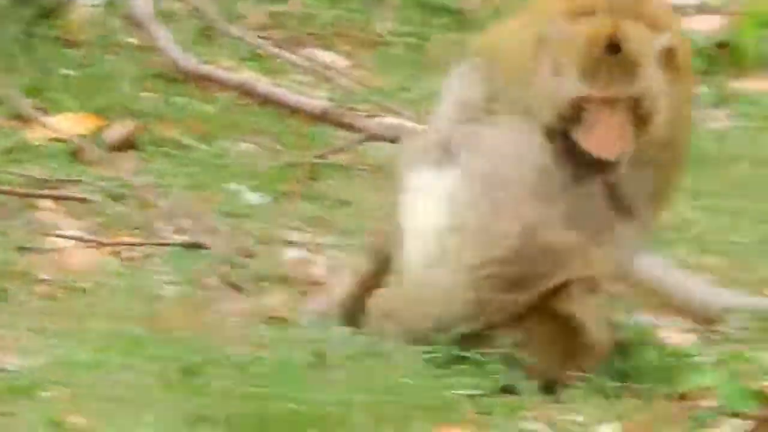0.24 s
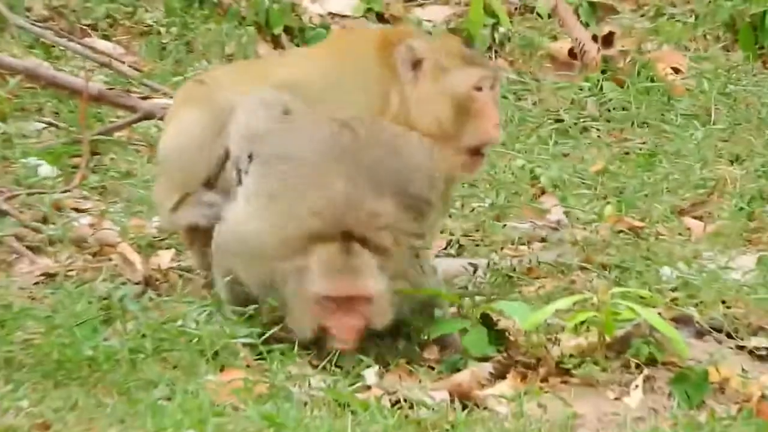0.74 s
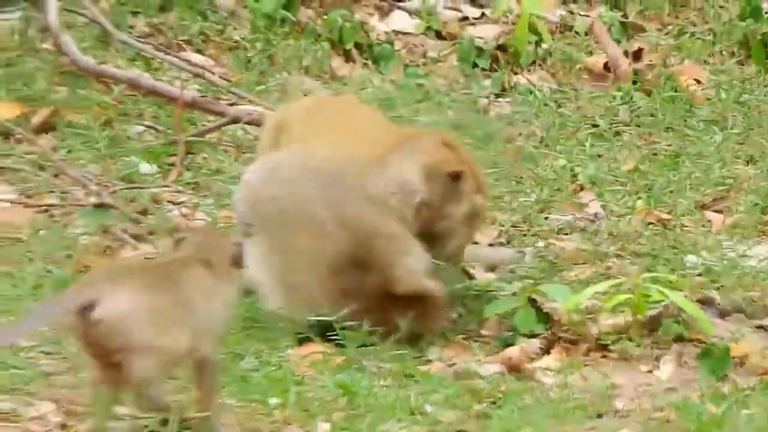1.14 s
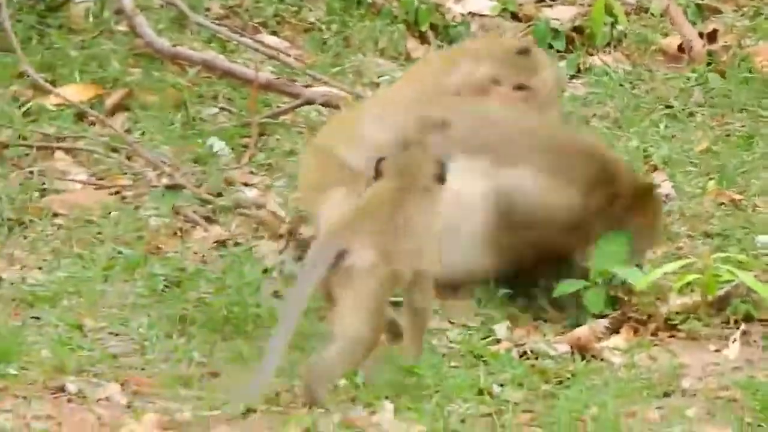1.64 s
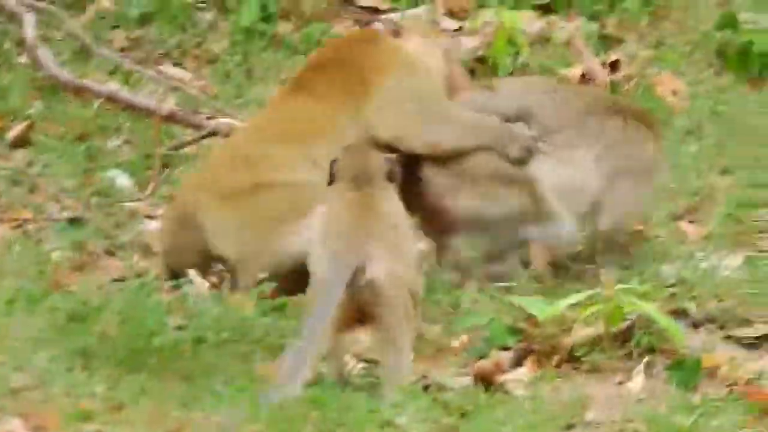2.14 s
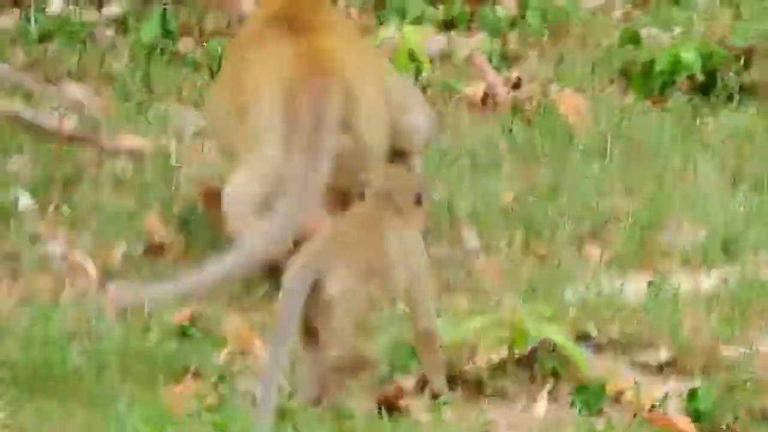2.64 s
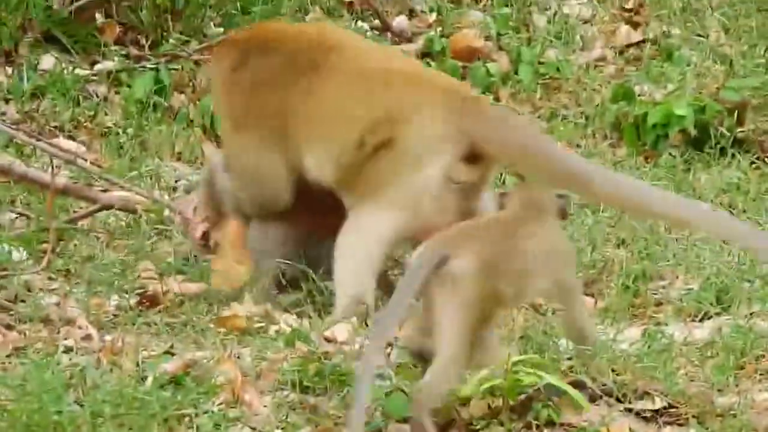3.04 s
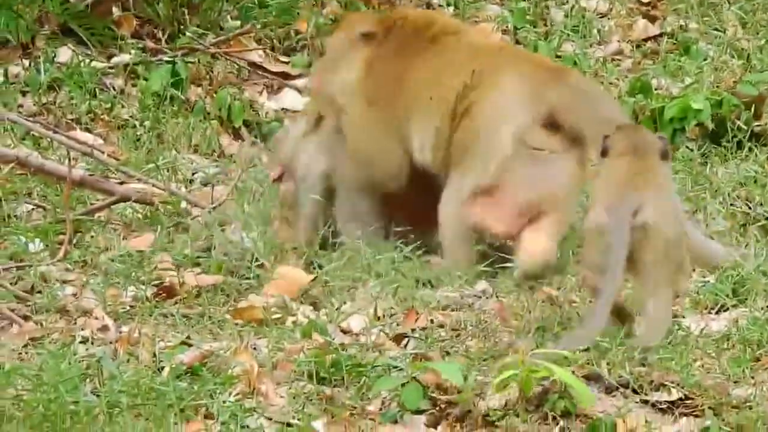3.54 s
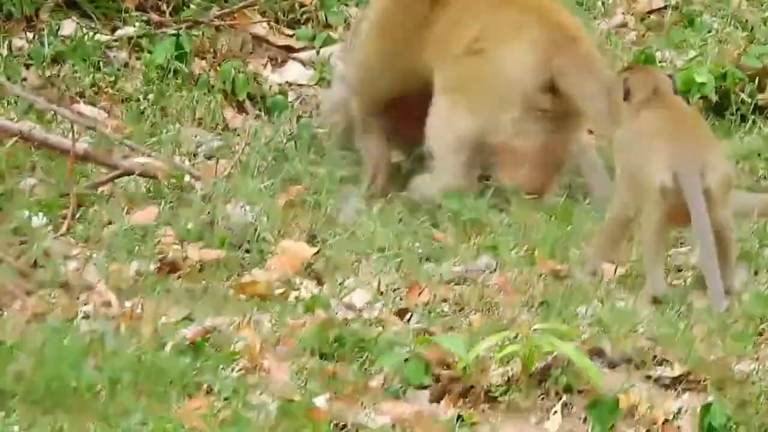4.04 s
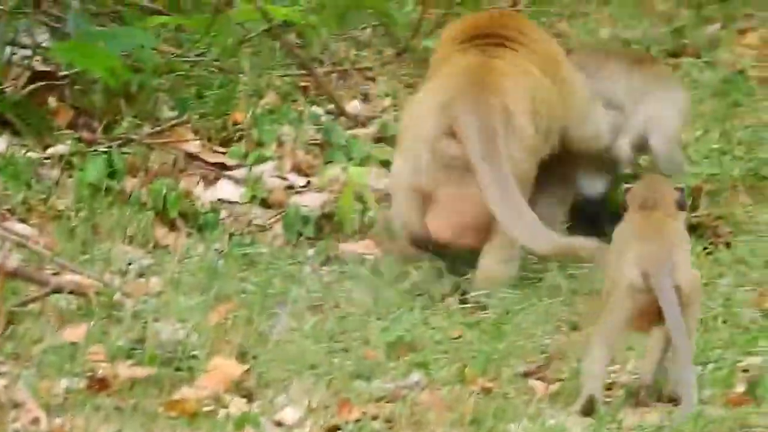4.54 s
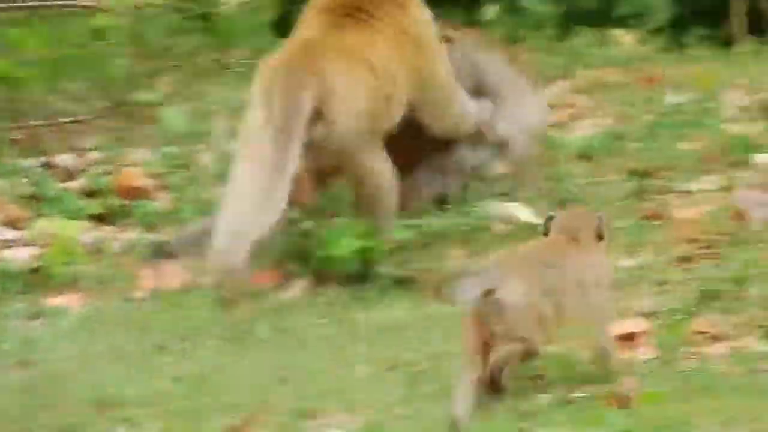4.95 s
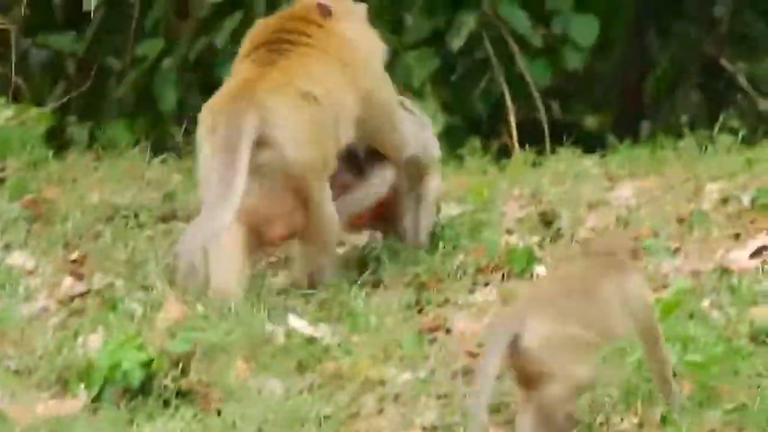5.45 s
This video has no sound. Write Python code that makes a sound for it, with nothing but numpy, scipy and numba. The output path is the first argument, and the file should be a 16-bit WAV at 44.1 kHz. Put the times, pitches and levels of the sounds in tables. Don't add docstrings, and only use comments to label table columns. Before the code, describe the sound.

Outdoors at a grassy forest edge, a macaque being bitten screams in harsh, noisy, very high bursts, cracking briefly into clean squeals. An adult gives one short rough grunt early on. After a tiny gap a second bout surges loudest, then weakens into thin whimpers. Distant traffic rumble, a faint engine hum and leaf hiss continue beneath. Stereo microphone some metres away, with light forest scatter.

```python
import sys
import numpy as np
from scipy import signal
from scipy.fft import rfft, irfft
from scipy.io import wavfile
from scipy.ndimage import uniform_filter1d
from numba import njit

SR = 44100
rng = np.random.default_rng(int(sys.argv[2]) if len(sys.argv) > 2 else 0)


def volts_from_decibels(level):
    exponent = np.asarray(level, float) / 20
    return 10 ** exponent


def transcribe(u):
    v = np.clip(np.atleast_2d(u).T, -1, 1)
    q = np.round(v * 32767).astype(np.int16)
    wavfile.write(sys.argv[1], SR, q)


N = 251811


def unit(x):
    return x / np.sqrt(np.mean(x ** 2))


def along(rows):
    s, *columns = np.transpose(rows)
    return [np.interp(np.arange(N) / SR, s, column) for column in columns]


def spans(rows):
    return [[(row[0],), (row[0] + row[1],)] for row in rows]


def gate(tables, fade_s, tail_s=None):
    t = np.arange(N) / SR
    total = 0
    for rows in tables:
        rise = (t - rows[0][0]) / fade_s
        fall = (rows[-1][0] - t) / (tail_s or fade_s)
        total = total + np.clip(np.minimum(rise, fall) + 1, 0, 1) ** 2
    return total


def walk(rate):
    hold = max(int(SR / rate), 1)
    steps = np.repeat(rng.standard_normal(N // hold + 1), hold)
    return unit(uniform_filter1d(uniform_filter1d(steps, hold), hold)[:N])


def colour(x, points):
    hz, db = np.transpose(points)
    bins = np.arange(N // 2 + 1) * SR / N + 1
    return irfft(rfft(x) * volts_from_decibels(np.interp(np.log(bins), np.log(hz), db)), N)


@njit
def svf(x, hz, width):
    y, band, low = np.empty(len(x)), 0., 0.
    for i in range(len(x)):
        g = np.tan(np.pi * hz[i] / SR)
        k = width / hz[i]
        v = (band + g * (x[i] - low)) / (1 + g * (g + k))
        band, low, y[i] = 2 * v - band, low + 2 * g * v, k * v
    return y


def steady(x):
    return x / np.sqrt(uniform_filter1d(x ** 2, size=2048) + 1e-12)


def resonance(x, hz, width_hz):
    return steady(svf(svf(x, hz, width_hz), hz, width_hz))


@njit
def folds(hz, stretch, size):
    pulses, phase, cycle = np.zeros(len(hz) + 1), 0., 0
    for i in range(len(hz)):
        step = hz[i] * stretch[cycle] / SR
        phase += step
        if phase >= 1:
            phase, cycle = phase - 1, cycle + 1
            pulses[i] += size[cycle] * phase / step
            pulses[i + 1] += size[cycle] * (1 - phase / step)
    return pulses[:-1]


def closings(hz, jitter, shimmer_db):
    chance = np.clip(rng.standard_normal((len(hz) // 4, 2)).T, -2, 2)
    return folds(hz, np.exp(jitter * chance[0]), volts_from_decibels(shimmer_db * chance[1]))


# (frequency [Hz], density [dB per Hz])
RUMBLE_SPECTRUM = [(15, -54), (25, -45.5), (46, -13.5), (76, 1.5), (157, -1), (183, -2), (238, -1),
                   (455, -15.5), (723, -17), (1000, -17), (1300, -30), (2200, -120)]
# (frequency [Hz], density [dB per Hz])
HISS_SPECTRUM = [(590, -77), (1000, -4.5), (1290, -3.5), (1490, -6), (1750, -5.5), (1990, -6.5),
                 (2280, -8.5), (2620, -10), (7100, -11.5), (9460, -28), (15500, -70)]
# (time [s], level [dB])
DEEP_TRAFFIC = [
    (0, 3.5),
    (1.2, 0.5),
    (4, -2),
    (5.7, -4),
]


def background():
    rumble, hiss = rng.standard_normal((2, 2, N))
    rumble = np.array([colour(noise, RUMBLE_SPECTRUM) for noise in rumble])
    deep = np.array([colour(noise, [(70, 3), (140, -16)]) for noise in rumble])
    rumble_gain = volts_from_decibels(-27)
    deep_change = (volts_from_decibels(along(DEEP_TRAFFIC)[0]) - 1) * deep * rumble_gain / rumble.std()
    rumble = unit(rumble) * rumble_gain + deep_change

    hum = resonance(rng.standard_normal(N), np.full(N, 189.), 14.) * volts_from_decibels(-35.5 + 1.5 * walk(3))
    hiss = unit(np.array([colour(noise, HISS_SPECTRUM) for noise in hiss])) * volts_from_decibels(-36 + .8 * walk(3))
    return rumble * volts_from_decibels(.8 * walk(4)) + hiss + hum * np.array([[1], [0]])


# (time [s], effort [dB], mouth opening as its centre resonance [Hz])
FIRST_BOUT = [
    [(0.0, -13, 6450), (0.07, -23, 6650), (0.08, -24, 6670), (0.122, -20, 6520), (0.248, -22, 6360),
     (0.324, -14, 5795), (0.39, -34, 5330)],
    [(0.585, -48, 6080), (0.597, -21.5, 5980), (0.659, -20.5, 6185), (0.715, -11.5, 5500),
     (0.779, -18.5, 6066), (0.965, -11.5, 5794), (1.051, -19.5, 6070), (1.075, -39, 5510)],
    [(1.2, -32, 6000), (1.21, -17, 5980), (1.238, -13.5, 5950), (1.294, -25, 6190), (1.584, -29, 6675),
     (1.7, -14, 5620), (1.726, -29, 5680), (1.77, -28.5, 5690)],
    [(1.928, -26.5, 5230), (1.948, -15, 5190), (1.966, -22, 5185), (2.012, -18, 5960), (2.066, -19, 6050),
     (2.11, -25, 5880)],
    [(2.243, -23.5, 6040), (2.267, -12, 6120), (2.329, -21.5, 5300), (2.37, -43, 5660)],
]
SECOND_BOUT = [
    [(2.54, -31, 6060), (2.564, -24, 5735), (2.652, -15.5, 6314), (2.882, -20.5, 5770),
     (2.974, -20.5, 6330), (3.032, -28.5, 6220), (3.09, -6, 6200), (3.155, -31, 5630)],
    [(3.415, -43, 6040), (3.421, -28, 6090), (3.445, -20.5, 6224), (3.533, -10, 5887), (3.545, -12.5, 5686),
     (3.727, -14.5, 5420), (3.809, -20, 4844), (3.92, -35.5, 5245)],
    [(4.08, -37, 5580), (4.094, -25.5, 5586), (4.144, -23, 6085), (4.2, -19, 5420), (4.248, -23.5, 5740),
     (4.368, -27.5, 5330), (4.42, -31, 5510)],
    [(4.52, -30.5, 4940), (4.556, -22.5, 5380), (4.628, -12.5, 5380), (4.658, -9, 5380), (4.674, -17, 5450),
     (4.734, -19, 5980), (4.84, -28, 6170), (4.95, -34, 5920)],
    [(4.99, -26.5, 6090), (5.026, -22.5, 5890), (5.062, -26, 5940), (5.12, -29.5, 4955), (5.162, -37, 4990),
     (5.2, -34, 5700)],
]


def effort():
    effort_db, centre_hz = along(sum(FIRST_BOUT + SECOND_BOUT, []))
    opening_hz = centre_hz - 5900
    opening_khz = opening_hz / 1000
    push_db = np.maximum(effort_db + 16, -8.5)
    lips_db = 8.5 * opening_khz + 0.01 * push_db
    throat_db = -0.3 + 3.4 * opening_khz - 0.26 * push_db
    top_db = -19.5 + 16.3 * opening_khz - 0.7 * push_db
    mouth_db = effort_db - 10 * np.log10(1 + volts_from_decibels(2 * lips_db))
    mouth_hz, lips_hz = 5419 + .6 * opening_hz, 6395 + .5 * opening_hz
    return mouth_db, mouth_hz, lips_db, lips_hz, throat_db, top_db


# (frequency [Hz], gain [dB])
MOUTH_ROLLOFF = [(7800, 0), (10500, -8), (15500, -24)]


def screams(flutter_db=1.0, duck_db=-5, patchy_db=2.0):
    mouth_db, mouth_hz, lips_db, lips_hz, throat_db, top_db = effort()
    pulses = closings(mouth_hz / 2 * np.exp(.06 * walk(120)), .13, 3)
    other = closings(lips_hz / 2 * np.exp(.07 * walk(120)), .13, 3)
    throat = steady(colour(pulses + other, [(500, -70), (1300, -20), (1900, 4), (2800, -7), (3600, 0),
                                            (4400, 3), (5200, -12)]))
    mouth = resonance(pulses, mouth_hz * (1 + .015 * walk(60)), 1650.)
    lips = resonance(other, lips_hz * (1 + .015 * walk(60)), 1950.)
    airy = pulses / pulses.std() + rng.standard_normal(N)
    top = steady(colour(airy, [(3000, -70), (6500, -16), (8300, 0), (10000, -4), (12500, -18), (15500, -42)]))

    patchy_mouth = volts_from_decibels(patchy_db * walk(30)) * mouth
    patchy_lips = volts_from_decibels(lips_db + patchy_db * walk(29.91)) * lips
    voice = colour(patchy_mouth + patchy_lips, MOUTH_ROLLOFF)
    voice = voice + volts_from_decibels(throat_db - 9.0) * throat
    voice = voice + volts_from_decibels(top_db - 5.0 + 1.07 * walk(24.7)) * top
    locked = np.clip(gate(spans(SHRIEKS + YELPS), 0.012), 0, 1)
    level = volts_from_decibels(mouth_db - 0.04 + flutter_db * walk(40) + duck_db * locked)
    return voice * level * gate(FIRST_BOUT + SECOND_BOUT, .011, .035)


# ((pitch [Hz], width [Hz]), strands (start [s], length [s], level [dB]))
REGISTERS = [
    ((1725, 370), [(.602, 0.19, -31.5), (1.032, 0.043, -35.5), (1.188, 0.048, -35.5), (3.502, 0.055, -40)]),
    ((2250, 500), [(0, 0.093, -32), (1.96, 0.085, -29.5), (2.367, .17, -32.5), (2.611, .34, -30.5), (4.68, 0.051, -23.5), (4.763, 0.086, -35.5), (4.992, 0.089, -27)]),
    ((2790, 440), [(.29, 0.086, -24), (2.62, 0.4, -32), (3.563, 0.23, -33), (4.272, 0.17, -33.5), (4.546, 0.083, -28.5), (4.757, .126, -40)]),
    ((3360, 420), [(.023, 0.41, -37.5), (.708, 0.028, -30), (.913, 0.16, -28.5), (1.217, .095, -32.5), (1.944, 0.052, -25.5), (2.24, 0.085, -27), (2.78, 0.16, -35), (3.072, 0.054, -32), (3.46, .1, -44), (3.562, 0.2, -22.5), (4.208, 0.09, -30.5), (4.532, 0.084, -29.5), (5.01, 0.04, -28.5)]),
    ((4400, 800), [(0, 0.087, -28), (1.0, 0.095, -25), (2.59, 0.085, -30.5), (3.47, 0.077, -33), (3.78, 0.096, -30)]),
]
# (start [s], length [s], first pitch [Hz], last pitch [Hz], level [dB])
SLIDES = [(.63, 0.095, 6226, 5300, -17), (.93, 0.11, 6446, 7300, -26.5), (1.294, .04, 7100, 7300, -30),
          (1.409, 0.078, 6300, 6500, -31), (1.666, .055, 5290, 5800, -21.5),
          (1.663, 0.085, 2700, 2257, -29), (2.289, 0.06, 5890, 5320, -25), (2.31, 0.036, 4780, 3890, -26),
          (2.673, 0.11, 3265, 3840, -27.5), (3.09, 0.028, 6500, 5900, -30), (3.721, .055, 3000, 2500, -28),
          (3.565, 0.0551, 5930, 6400, -19), (4.122, 0.16, 1820, 2144, -34), (4.52, 0.12, 1861, 2224, -27.5),
          (5.101, 0.05, 4410, 4216, -30)]


def strands():
    out, flicker, sway = np.zeros(N), volts_from_decibels(3 * walk(70)), walk(50)
    events = []
    for (hz, width_hz), rows in REGISTERS:
        for start, length, db in rows:
            events.append((start, length, hz, hz * (1 - .015), db, width_hz))
    for start, length, first_hz, last_hz, db in SLIDES:
        events.append((start, length, first_hz, last_hz, db, 400))

    for start, length, first_hz, last_hz, db, width_hz in events:
        a, b = int(start * SR), int((start + length) * SR)
        hz = np.linspace(first_hz, last_hz, b - a)
        pulses = closings(hz, width_hz / first_hz, 2.5)
        voice = resonance(pulses, hz * (1 + .02 * sway[a:b]), 1.3 * width_hz)
        out[a:b] += volts_from_decibels(db) * voice * signal.windows.tukey(b - a, .3) * flicker[a:b]
    return out


# (start [s], length [s], first pitch [Hz], last pitch [Hz], level [dB])
SHRIEKS = [
    (.705, 0.036, 2795, 2650, -19),
    (.876, 0.031, 2283, 2770, -22),
    (.915, 0.054, 2838, 2900, -18),
    (3.535, 0.032, 2050, 2191, -20),
    (3.74, 0.023, 2718, 2510, -19),
    (4.6, 0.058, 2544, 2750, -18.5),
]
# (start [s], length [s], first pitch [Hz], last pitch [Hz], level [dB])
YELPS = [
    (2.275, 0.029, 1175, 1192, -20),
    (3.089, 0.062, 1066, 848, -24.5),
]
# (start [s], length [s], first pitch [Hz], last pitch [Hz], level [dB])
WHIMPERS = [(.3, 0.021, 2140, 2380, -23.5), (.31, 0.024, 2670, 2814, -29), (.367, 0.017, 1762, 1500, -30),
            (1.752, 0.019, 1667, 1525, -34), (2.325, 0.063, 2060, 1955, -25),
            (2.35, 0.02, 2360, 2356, -18.5), (4.36, 0.027, 1641, 1570, -32.5),
            (4.645, 0.026, 2690, 2740, -21.5), (4.672, 0.015, 2216, 2194, -24),
            (5.053, 0.051, 2812, 2734, -24.5), (5.118, 0.052, 1798, 1393, -33.5)]


def squeals(wobble=.012, shimmer_db=3):
    out, t = np.zeros(N), np.arange(N) / SR
    tremble, shimmer = 1 + wobble * walk(250), volts_from_decibels(shimmer_db * walk(150))
    kinds = ((SHRIEKS, (-17, 0, -28)), (YELPS, (-30, 0, -11, -2, -3, -6)), (WHIMPERS, (0, -16, -28)))
    for rows, partials_db in kinds:
        for row in rows:
            start, length, first_hz, last_hz, db = row
            bend = 2.2 if last_hz < first_hz else 1
            done = np.clip((t - start) / length, 0, 1) ** bend
            hz = (first_hz + (last_hz - first_hz) * done) * tremble
            phase = 2 * np.pi * np.cumsum(hz) / SR
            tone = np.zeros(N)
            for k, partial_db in enumerate(partials_db):
                tone += volts_from_decibels(db + partial_db) * np.sin((k + 1) * phase)
            out += np.sqrt(2) * tone * shimmer * gate(spans([row]), .006)
    return out


# (time [s], pitch [Hz], level [dB])
GRUNT = [
    (1.2, 397.6, -32),
    (1.23, 429, -38),
    (1.3, 422.7, -32.5),
    (1.35, 410, -45),
]


def grunt():
    hz, db = along(GRUNT)
    pulses = closings(hz, 0.0625, 4.6)
    voice = colour(pulses, [(250, -33), (420, -1.5), (850, -0.5), (1500, -15), (2500, -38.0)])
    return unit(voice) * volts_from_decibels(db) * gate([GRUNT], 0.0092)


def forest(voice):
    t, t60_s = np.arange(SR) / SR, 1.05
    early = np.exp(-t / .008)
    late = np.exp(-np.log(1000) * t / t60_s) * np.clip(t / .02, 0, 1)
    shape = volts_from_decibels(-10) * early / np.linalg.norm(early) + volts_from_decibels(-10) * late / np.linalg.norm(late)
    mid, side = (signal.fftconvolve(voice, shape * noise)[:N] for noise in rng.standard_normal((2, SR)))
    return voice + mid, volts_from_decibels(-2.5) * side


# (frequency [Hz], gain [dB])
VOICE_ROLLOFF = [(9500, 0), (12000, -6), (15500, -22)]
# (frequency [Hz], level difference [dB])
SPREAD = [(60, -27), (110, -22.5), (200, -27.5), (380, -22), (700, -17), (1290, -18), (2380, -7.5),
          (4400, -4.5), (8120, 0.5), (15000, 4)]


def scene():
    voices = screams() + strands() + squeals() + grunt()
    mid, side = np.array(forest(colour(voices, VOICE_ROLLOFF))) + background()
    side = colour(side, SPREAD)
    return np.array([mid + side, mid - side])


def low_pass(x):
    return signal.sosfilt(signal.butter(12, 15640, fs=SR, output="sos"), x)


# (frequency [Hz], gain [dB])
HOUSING = [(3600, 0), (3950, -4), (4300, 0)]


def record(dry):
    heard = np.array([colour(channel, HOUSING) for channel in dry])
    rounded = heard / (1 + np.abs(heard / .97) ** 10) ** (1 / 10)
    return low_pass(rounded)


dry = scene()
out = record(dry)
transcribe(out)
```